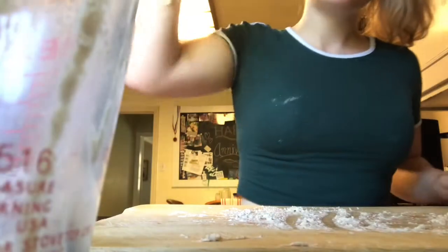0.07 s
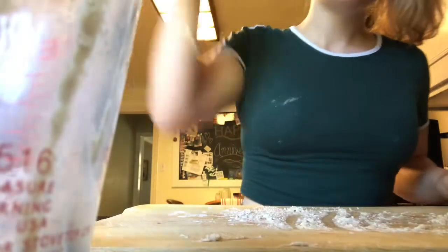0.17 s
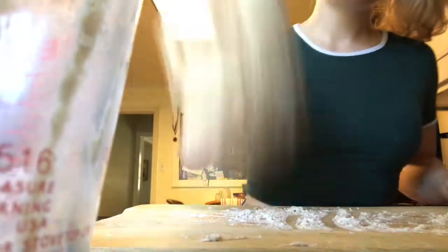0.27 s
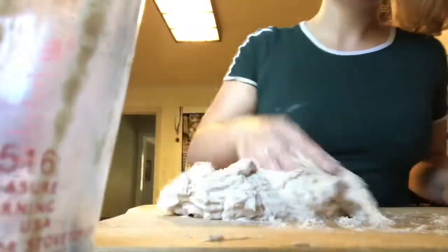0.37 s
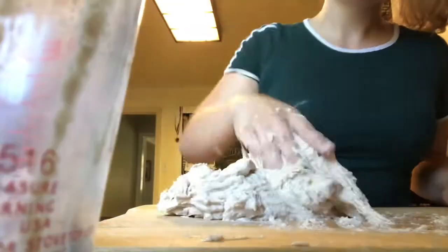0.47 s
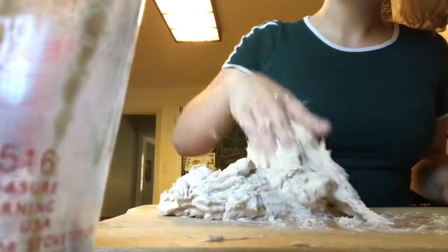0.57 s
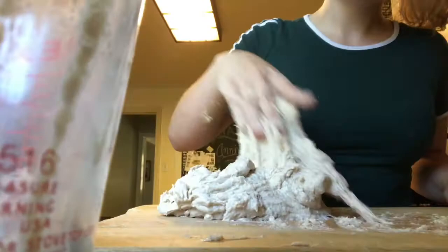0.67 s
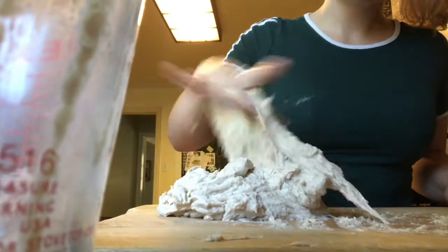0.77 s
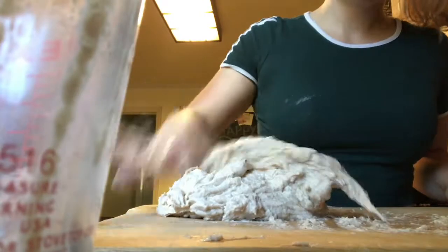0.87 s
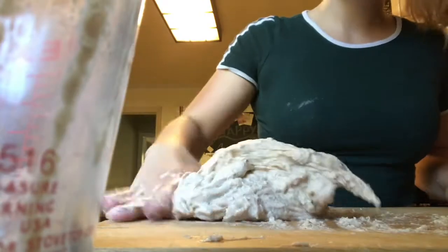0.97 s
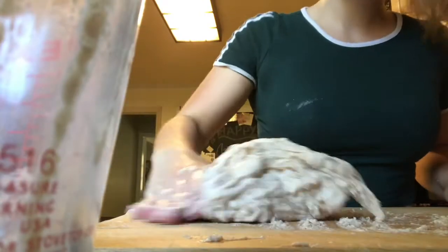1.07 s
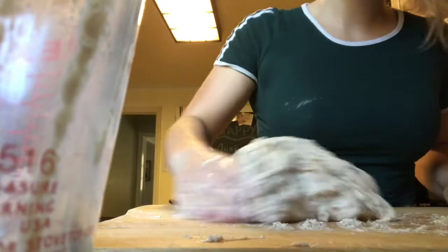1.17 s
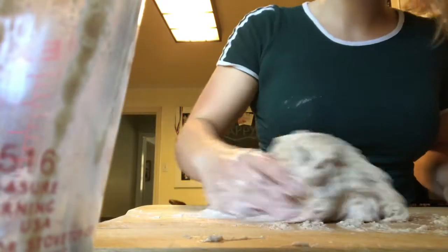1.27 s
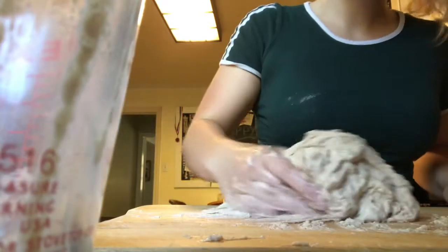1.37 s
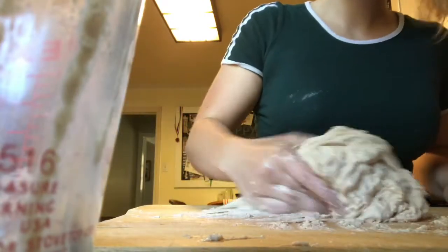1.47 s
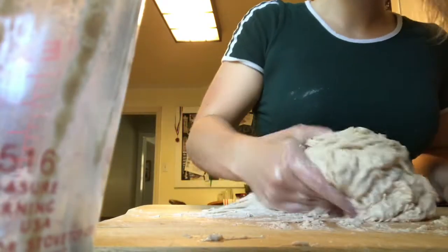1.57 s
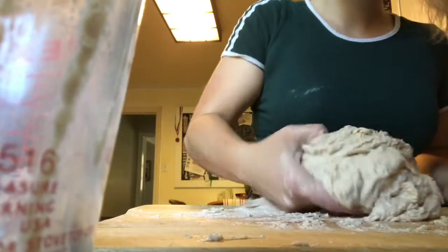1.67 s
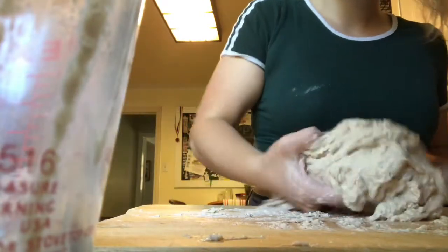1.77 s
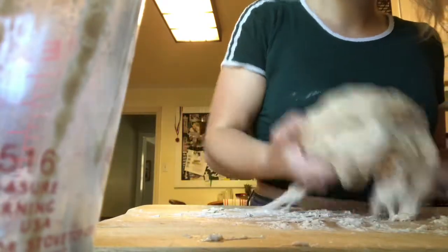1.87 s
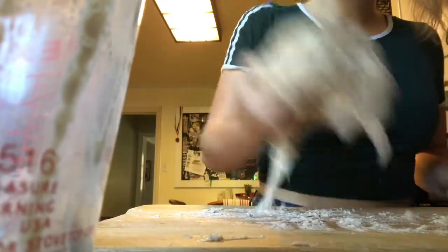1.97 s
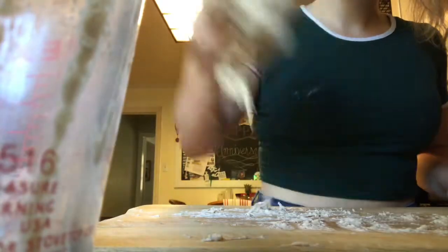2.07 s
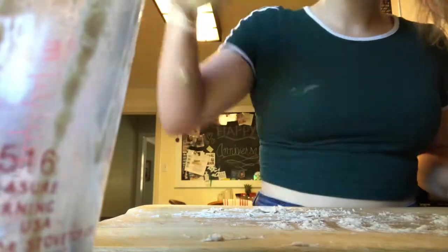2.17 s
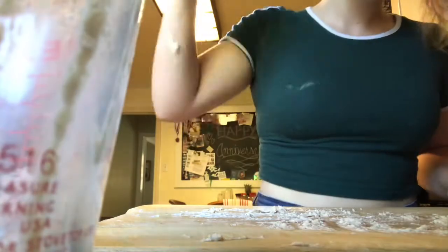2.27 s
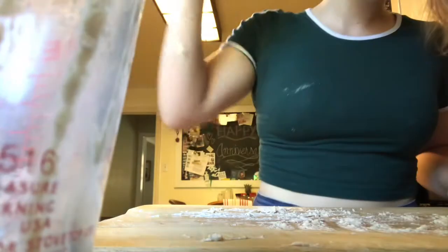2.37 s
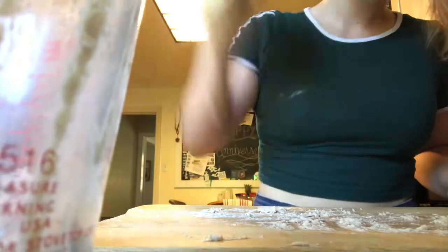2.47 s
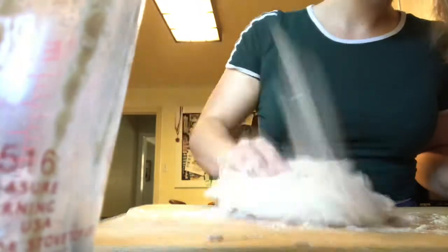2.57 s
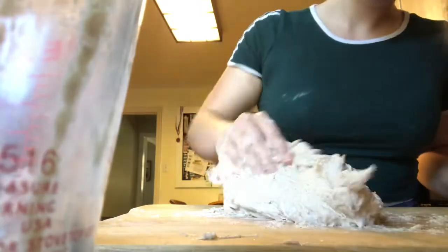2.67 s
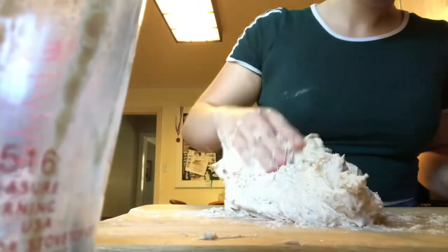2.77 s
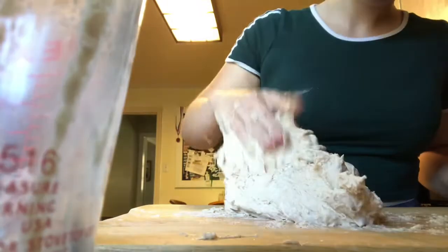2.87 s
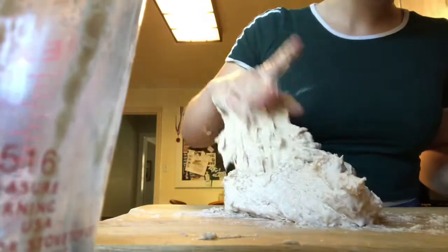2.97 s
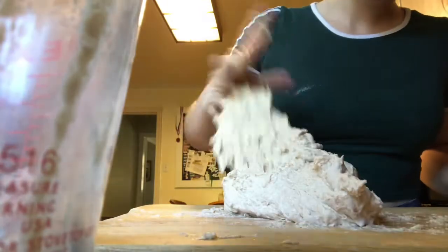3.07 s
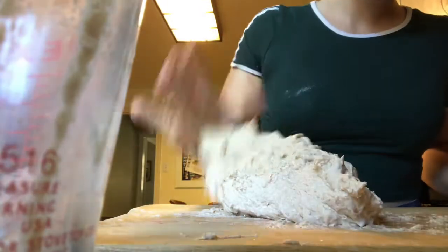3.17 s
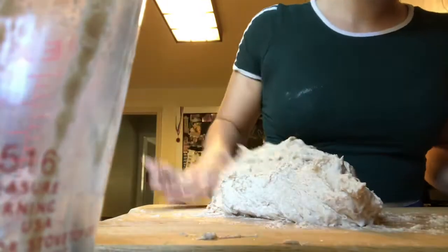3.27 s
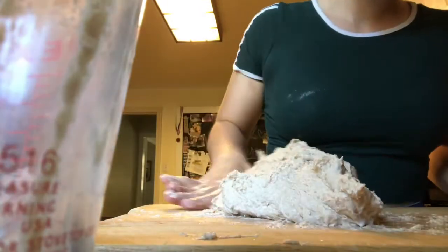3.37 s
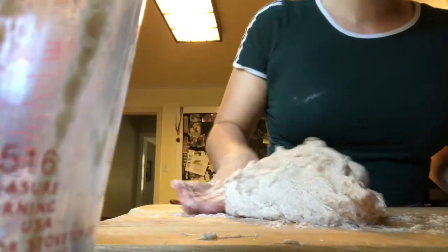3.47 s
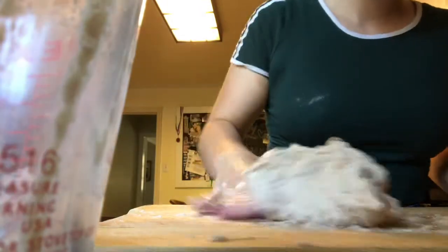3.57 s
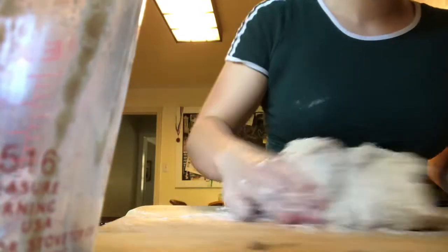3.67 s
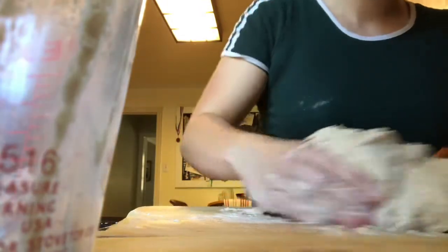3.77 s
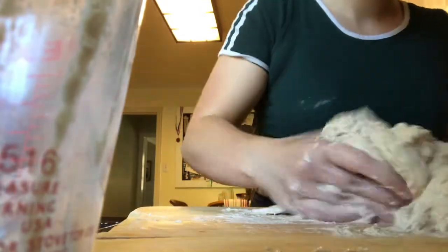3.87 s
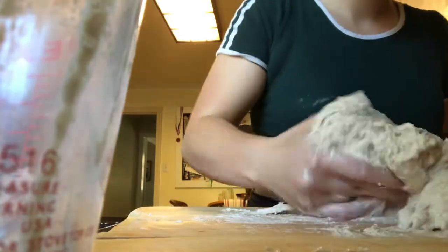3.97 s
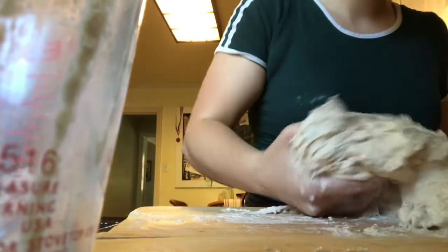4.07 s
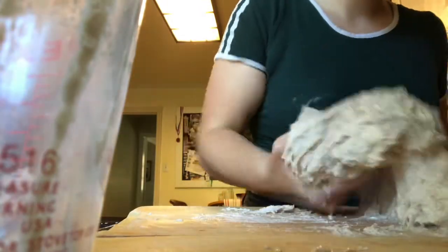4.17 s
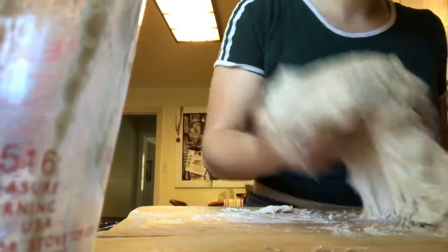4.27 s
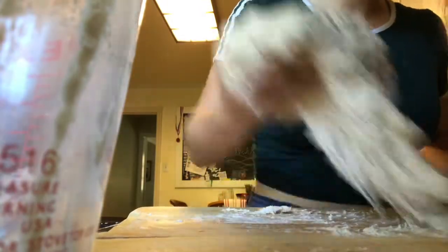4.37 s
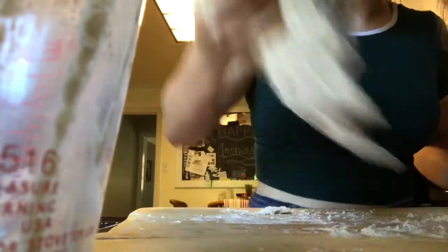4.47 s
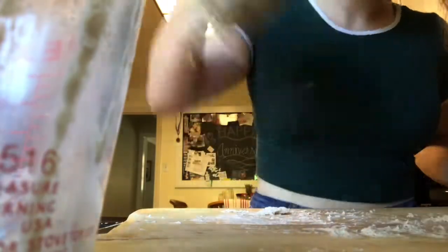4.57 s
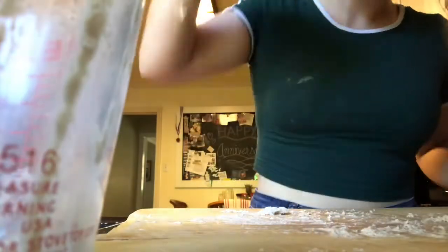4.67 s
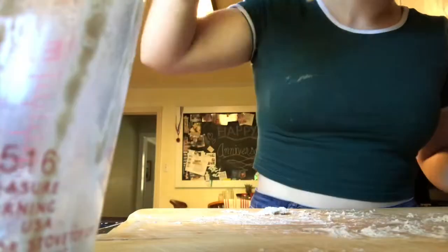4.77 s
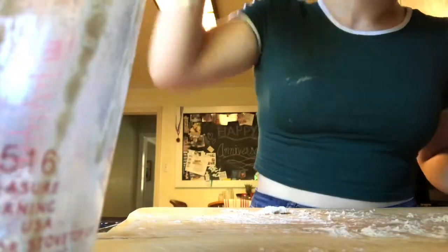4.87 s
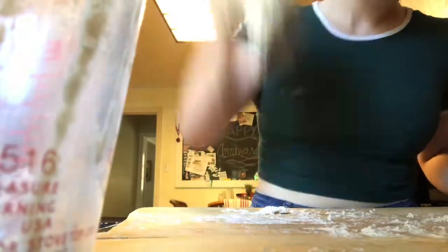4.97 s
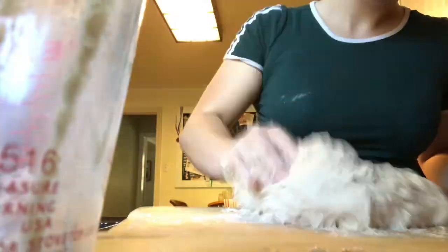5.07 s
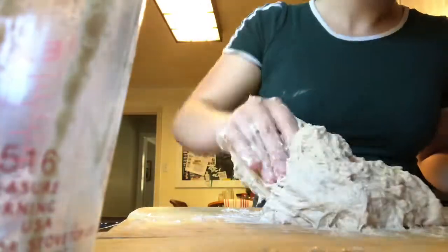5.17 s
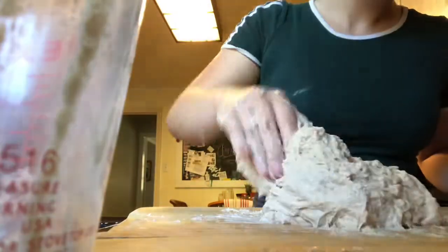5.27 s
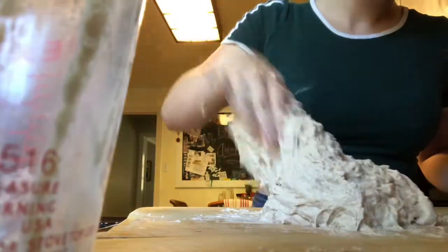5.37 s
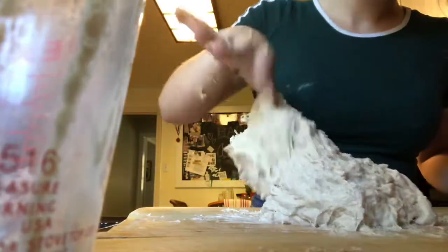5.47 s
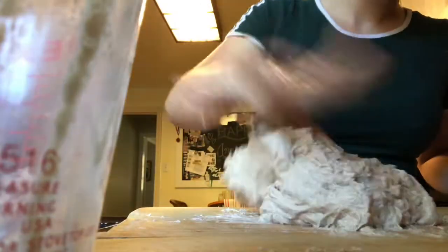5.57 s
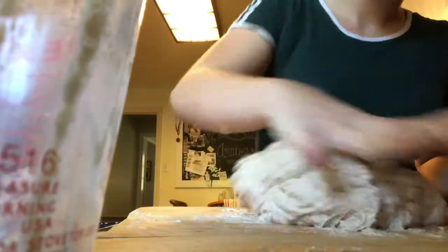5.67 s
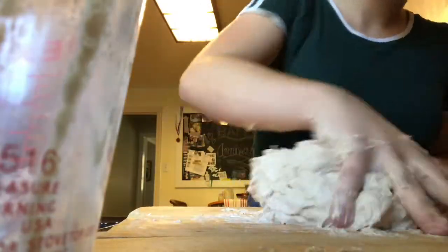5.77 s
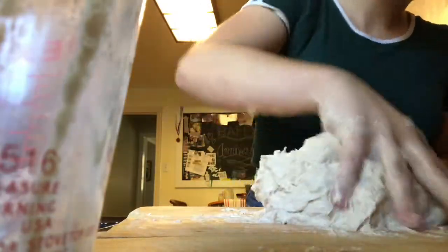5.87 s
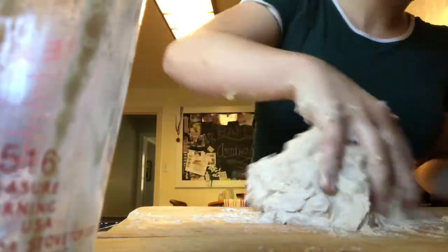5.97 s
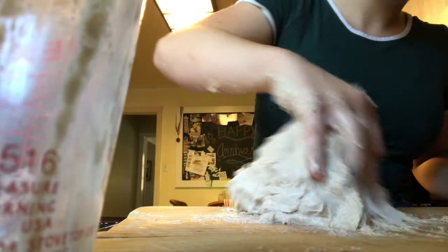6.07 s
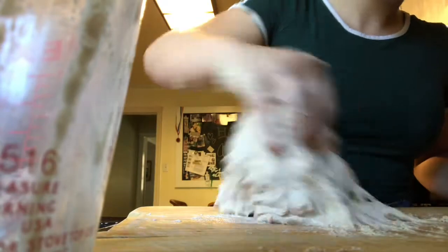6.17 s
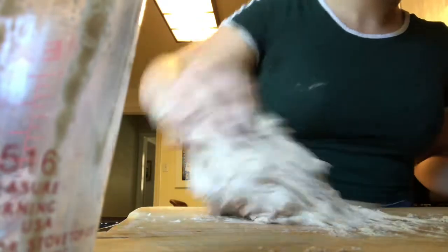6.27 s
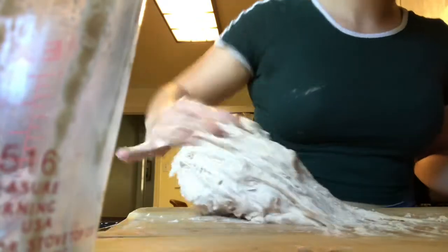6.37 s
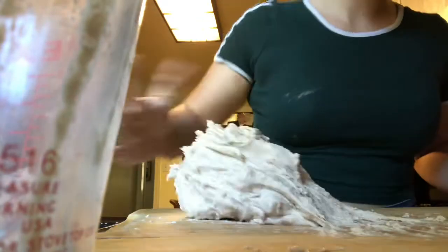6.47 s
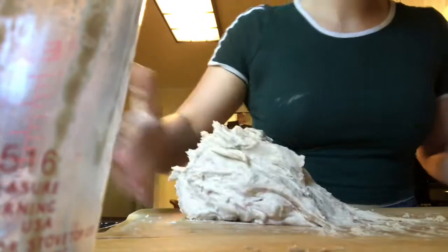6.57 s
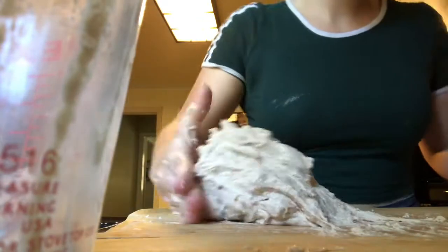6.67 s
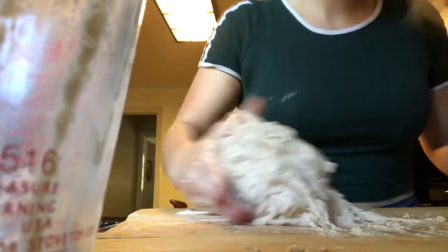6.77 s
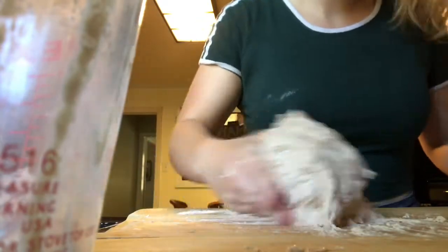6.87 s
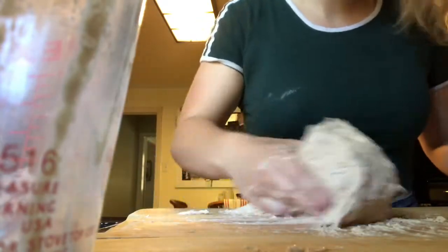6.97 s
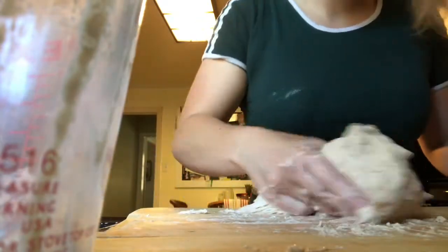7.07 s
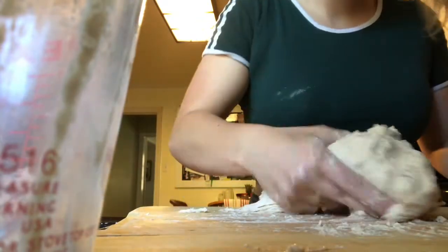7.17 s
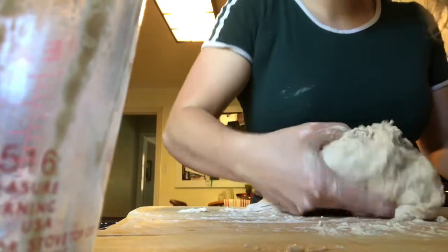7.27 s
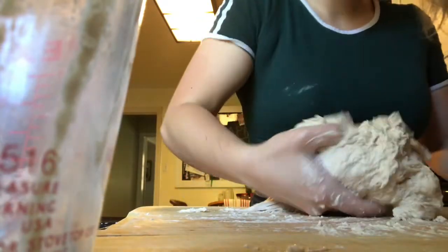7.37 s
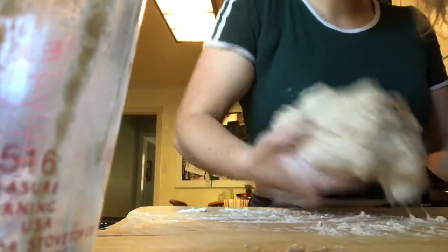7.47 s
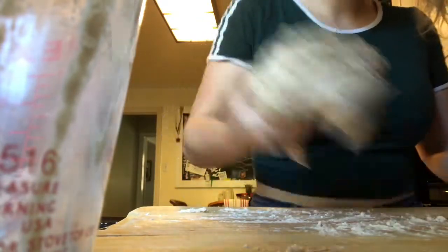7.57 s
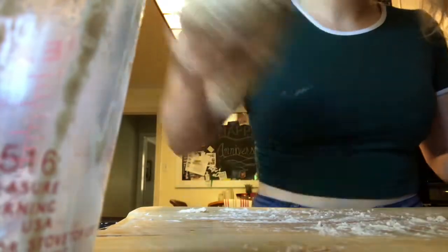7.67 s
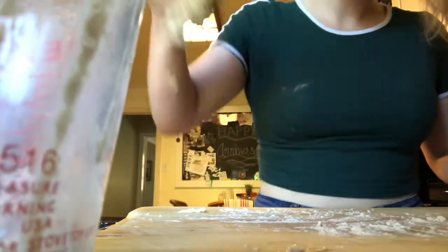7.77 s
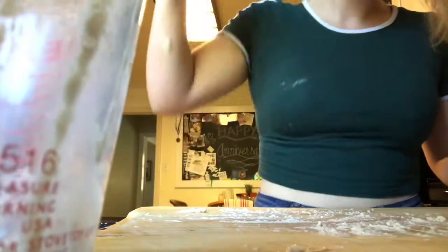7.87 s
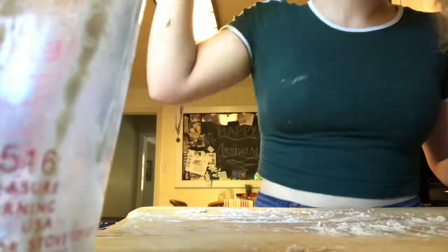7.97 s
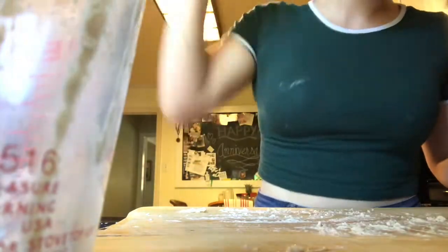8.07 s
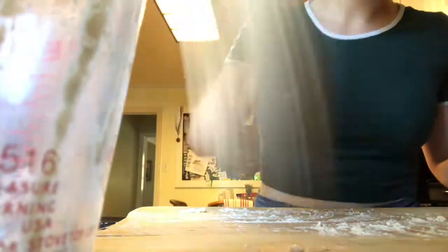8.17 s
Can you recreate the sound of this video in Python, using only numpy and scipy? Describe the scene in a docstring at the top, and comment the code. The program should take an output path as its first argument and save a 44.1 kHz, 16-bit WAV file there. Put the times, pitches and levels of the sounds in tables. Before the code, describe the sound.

Very close in a home kitchen, with faint room air and a low wavering hum. After a slight rustle, dough slams at 0.3 s: a wet smack, heavy woody thud, tail slap and short room ring. Sticky crackle and hissing rubs follow from 1 to 1.8 s, with a rising wipe near 1.1 and little strand ticks. The second slam comes at 2.5 s; dull taps from a loose object quicken and fade from 2.8. A stronger rub at 3.5-3.8 leads to soft low thuds and three accelerating hollow board knocks around 4.5-4.6. The third slam, boomier, hits at 5.0 s, followed by fainter rattling, a firm slap at 5.65, peeling crackle, a duller pat at 6.4 and another sharp slap at 7.1 with a brief falling wipe. Quiet returns until the fourth slam at 8.2 s. Automatic gain dips after loud blows and recovers.

```python
"""A kitchen, close to a floured wooden board: wet dough is slammed down four times beside a phone microphone.
Each slam is a noisy wet smack over a burst of force that excites the board's resonances and the room.
In between, hissing rubs and sleeve rustle, sticky crackle, strand ticks, pats, soft low thuds and board knocks;
a loose object rocks in dying taps. Room air and a low wavering hum lie behind.
The phone's gain control ducks the loud blows and then lets the room swell back."""
import sys
import numpy as np
from scipy import signal
from scipy.fft import rfft, irfft, next_fast_len
from scipy.io import wavfile
from scipy.ndimage import uniform_filter1d, minimum_filter1d, map_coordinates

SR = 44100
rng = np.random.default_rng(int(sys.argv[2]) if len(sys.argv) > 2 else 0)


def wav_record(signal):
    """Record a signal, one row per channel, as 16-bit PCM in the file named by sys.argv[1]."""
    frames = np.transpose(np.atleast_2d(signal))
    bounded = np.clip(frames, -1, 1)
    # unit amplitude maps onto the largest positive 16-bit level
    quanta = np.round(bounded * 32767).astype(np.int16)
    wavfile.write(sys.argv[1], SR, quanta)


N = 361708  # length of the scene in samples
CLOCK = np.arange(N) / SR  # scene time in seconds
T = np.arange(SR * 3 // 4) / SR  # time within one blow, in seconds

# Dough slammed on the board. Each row: start in seconds, level in dB, wet smack in dB against the level,
# dull above in Hz, bass in dB, hollow boom in dB, tail delay in seconds, tail slap in dB.
SLAM_EVENTS = [(0.280, 6.5, -8, 2405, 2, -1.5, 0.067, 1.5), (2.533, 4, -8.5, 2436, -1, -8.5, 0.038, 7),
               (5.016, 6.5, -11, 1514, 1, 6, .049, -10.5), (8.183, 4, -8, 2260, -5.5, 4, .05, -11)]
# Resonances of the board on its counter. Each row: centre in Hz, width in Hz, lift in dB.
BOARD_MODES = [(119, 14, 4.5), (144.4, 26, 11.5), (234, 10, -3), (373, 200, 1.5), (422, 16, 6.5),
               (512.7, 8.1, 6.5), (705, 17, 4), (957, 58, 3.5), (1050, 43, 1), (1255, 32, 4),
               (1476, 60, -3), (1687, 20, -3), (2310, 17, -0.5)]
# Colour of the dough's weight landing. Each row: frequency in Hz, gain in dB.
THUD_COLOUR = [(25, -18), (50, 0), (130, -3), (230, -4), (420, -1), (700, -2), (1400, 1), (2500, -3),
               (6000, -3.5)]
# Colour of the wet skin's smack. Each row: frequency in Hz, gain in dB.
SMACK_COLOUR = [(200, -20), (900, 4), (2000, 2.5), (5000, -3), (8000, -8.5), (12000, -17.5), (16000, -7.5)]
# Colour of the lighter slaps on the board. Each row: frequency in Hz, gain in dB.
SLAP_COLOUR = [(40, -17), (120, -4.5), (230, 2), (330, 2.5), (700, 2), (1300, 1), (2500, 0), (6000, -4.5)]
# Pats and drops on the board. Each row: start in seconds, level in dB, dull above in Hz,
# contact in seconds, bass in dB, hollow boom in dB.
PAT_EVENTS = [(3.884, -41, 1500, 0.0075, 4, 7), (4.385, -29, 1000, .011, 4, 7.5),
              (5.613, -27.5, 1150, 0.023, 7.5, 6.5), (5.654, -6, 2155, 0.0035, -2, 0),
              (6.401, -13.5, 2900, 0.0068, 8.5, 1.5), (7.0937, -6.5, 1975, 0.0024, -2.5, -3.5)]
# Dough settling its weight, and the board dropping back. Each row: start in seconds, level in dB.
LOW_THUDS = [(0.92, -50), (1.527, -45.5), (3.633, -36.5), (4.392, -37.5), (4.518, -30), (4.621, -36.5),
             (4.853, -42), (6.644, -41.5)]
# Movements of hand, arm and dough, with the sleeve's rustle as the arm swings.
# Each row: start in seconds, end in seconds, rub or rustle in dB ahead of a common trim, crackle in dB.
MOVEMENTS = [(0, 0.18, -62, -102), (0.98, 1.807, -58, -61), (2.976, 3.534, -65.5, -69),
             (3.49, 3.844, -47.5, -67), (3.854, 4.477, -58, -61), (4.81, 5.023, -61.5, -72),
             (5.736, 6.31, -72.5, -61.5), (6.278, 6.436, -53, -52), (6.455, 7.47, -57, -62)]
# Colour of the rub and rustle. Each row: frequency in Hz, gain in dB.
RUB_COLOUR = [(150, -13.5), (350, 3), (750, -2.5), (1300, -0.5), (2500, -6), (4000, -12), (6000, -12.5),
              (10000, -21.5), (16000, -18)]
# Quick wipes with pitched hiss. Each row: start in seconds, end in seconds, first pitch in Hz,
# last pitch in Hz, level in dB that the swell reaches at the end, ahead of the movement's own shape.
WIPES = [(0.99, 1.178, 1450, 2930, -41), (7.2, 7.314, 2400, 1945, -40)]
# Dough pulled off the fingers or the wood. Each row: start in seconds, crackle in dB.
STICKY_PULLS = [(0.66, -61.5), (1.66, -53), (2.899, -58), (5.288, -57)]
# Colour of sticky bonds breaking. Each row: frequency in Hz, gain in dB.
CRACKLE_COLOUR = [(2000, -12.5), (5000, -7), (9000, -9.5), (13000, -6.5), (16000, -2.5)]
# Thick strands of dough letting go. Each row: start in seconds, level in dB ahead of a common trim.
THICK_STRANDS = [(0.842, -39.5), (1.164, -30.5), (1.892, -38), (2.47, -34.5), (2.957, -34), (2.996, -30.5),
                 (4.072, -31), (4.364, -28), (6.701, -30.5)]
# Bouts of rocking. Each row: first tap in seconds, first gap in seconds, level in dB, fade in dB per second.
ROCKING_BOUTS = [(2.831, .0855, -37, 4), (5.336, .058, -45, 12)]
# Modes of the loose object. Each row: frequency in Hz, level in dB, time to fall 60 dB in seconds.
ROCKER_MODES = [(286, -10.5, 0.18), (358, -4.5, 0.098), (431, -4.5, 0.15)]
# Decay of the kitchen. Each row: frequency in Hz, time to fall 60 dB in seconds.
ROOM_DECAY = [(60, 0.49), (200, 0.24), (500, .35), (1200, 0.39), (3000, .38), (7000, 0.42), (15000, 0.23)]
# Colour of the room air. Each row: frequency in Hz, gain in dB.
AIR_COLOUR = [(25, -17.5), (62, -9), (125, -11.5), (220, -14), (350, -11), (600, -18), (1400, -27),
              (3000, -33.5), (7000, -36.5), (16000, -52.5)]
# Slow swell of the hum. Each row: time in seconds, level in dB ahead of a common lift.
HUM_SWELL = [(0, -65.5), (0.8, -62), (1.55, -54.5), (3.1, -63), (4.2, -58), (6.1, -60), (8.2, -68.5)]
# Tones of the hum. Each row: frequency in Hz, relative level in dB.
HUM_PITCHES = [(64.5, 0), (104, -8.5)]


def slams(land=0.013, sag=0.015, spread=0.045, smack_life=0.0083, smack_rise=0.0016, lumps_db=3, wet_db=-7):
    """The wet skin smacks first; then the mass flattens lump by lump and drives the board, its bass last."""
    out = np.zeros(N)
    low = lambda hz: 1 / (1 + (hz / 400) ** 4)
    for s, db, smack_db, dull_hz, bass_db, boom_db, _, _ in SLAM_EVENTS:
        smack_shape = np.exp(-T / smack_life) * (1 - np.exp(-T / smack_rise))
        smack = amp(smack_db) * noise(SMACK_COLOUR, len(T)) * smack_shape
        lumps = amp(lumps_db * wobble(250)[:len(T)])
        force = rng.standard_normal(len(T)) * lumps * np.exp(-(T / spread) ** 2)
        landing = even(force * (1 - np.exp(-(T / land) ** 2)))
        sagging = even(force * (1 - np.exp(-(T / sag) ** 2)))
        load = landing + filtered(sagging - landing, low)  # the bass follows the slower rise
        body = strike_board(load, THUD_COLOUR, softness(dull_hz, bass_db, steep=4.0), boom_db)
        body *= np.sqrt(spread * SR / 2) / np.linalg.norm(body)
        add(out, s, amp(db) * in_kitchen(smack + body, wet_db))
    return out


def flaps(graze_lead=.016, graze_db=-34.5, rebound=.11, rebound_db=-10):
    """Around each slam the loose end grazes the board, the tail slaps down and the lump flops back."""
    out = np.zeros(N)
    for s, *_, tail_s, tail_db in SLAM_EVENTS:
        add(out, s - graze_lead, amp(graze_db) * knock(contact=0.012, dull_hz=2450, bass_db=-5))
        add(out, s + tail_s, amp(tail_db) * knock(contact=.012, dull_hz=2850, bass_db=-1))
        add(out, s + rebound, amp(rebound_db) * knock(contact=0.0045, dull_hz=2040, bass_db=-25.5))
    return out


def pats():
    """Hand and dough strike the board between the slams, each contact with its own length and softness."""
    out = np.zeros(N)
    for s, db, dull_hz, contact, bass_db, boom_db in PAT_EVENTS:
        blow = knock(contact, dull_hz, bass_db, boom_db, thump_db=0, thump_life=0.0094, thump_hz=670, wet_db=-9)
        add(out, s, amp(db) * blow)
    return out


def low_thuds():
    """Soft low thuds: dough settling its weight, and the board dropping back; a soft contact has no treble."""
    out = np.zeros(N)
    for s, db in LOW_THUDS:
        add(out, s, amp(db) * knock(contact=0.025, dull_hz=270, bass_db=9, thump_life=.015))
    return out


def clatter(first_s=4.504, first_gap=.048, shrink=.76, level_db=-24, swell_db=2, count=3):
    """Lifted by the sticky dough, the board drops back and knocks ever faster and harder, ringing hollow."""
    out = np.zeros(N)
    for k in range(count):
        s = first_s + first_gap * (1 - shrink ** k) / (1 - shrink)  # each gap is shrink times the last
        blow = knock(contact=0.0036, dull_hz=1750, bass_db=3, boom_db=7,
                     thump_db=-4.5, thump_life=.014, thump_hz=475, wet_db=-10)
        add(out, s, amp(level_db + swell_db * k) * blow)
    return out


def rubbing(rub_db=-1, uneven_db=2, bounce=0.12, comb_hz=2680, stick_db=-6, stick_rate=60):
    """Sliding dough and the rustling sleeve hiss as noise, with the small jerks of catch and slip."""
    jerks = amp(2.5 * wobble(300))
    # the hiss also bounces off the board just below, which combs its spectrum
    comb = lambda hz: 1 + bounce * np.exp(-2j * np.pi * hz / comb_hz)
    hiss = noise(RUB_COLOUR, N, comb) * jerks
    slips = (rng.random(N) < stick_rate / SR) * rng.standard_normal(N)  # stick_rate slips a second
    slips = unit(filtered(slips, lambda hz: causal(amp(along(RUB_COLOUR, hz)))))
    rub = hiss + amp(stick_db) * slips
    # lows and highs waver separately
    lows = filtered(rub, lambda hz: 1 / (1 + (hz / 2200) ** 4))
    rub = lows * amp(uneven_db * wobble(13)) + (rub - lows) * amp(uneven_db * wobble(28))
    pressure = sum(amp(db) * movement(start, end) for start, end, db, _ in MOVEMENTS)
    return in_kitchen(amp(rub_db) * rub * pressure, wet_db=-10.5)


def scrapes(width_hz=550, swell_db=17):
    """A wipe swells while its band of hiss glides: low noise is shifted up by a gliding tone."""
    out = np.zeros(N)
    for start, end, first_hz, last_hz, db in WIPES:
        band = unit(filtered(rng.standard_normal(N), lambda hz: 1 / (1 + (hz / width_hz) ** 2)))
        pitch = np.interp(CLOCK, [start, end], [first_hz, last_hz])
        phase = 2 * np.pi * np.cumsum(pitch) / SR
        swell = amp(np.interp(CLOCK, [start, end], [db - swell_db, db]))
        out += band * np.sin(phase) * movement(start, end) * swell
    return out


def peeling(grain_rate=700, clump_db=3, pull=0.18):
    """Tiny sticky bonds break in clumps as the dough is moved or pulled."""
    # grain_rate bonds a second; each pull lasts pull seconds
    bonds = (rng.random(N) < grain_rate / SR) * rng.standard_normal(N) * amp(clump_db * wobble(30))
    crackle = filtered(bonds, lambda hz: amp(along(CRACKLE_COLOUR, hz)))
    crackle = unit(in_kitchen(crackle, wet_db=-1.5))
    moved = sum(amp(db) * movement(start, end) for start, end, _, db in MOVEMENTS)
    pulled = sum(amp(db) * movement(start, start + pull) for start, db in STICKY_PULLS)
    return crackle * (moved + pulled)


def snaps(trim_db=-9, thin_db=-45, scatter_db=4, count=20):
    """A stretched strand parts with a small bright tick; thin ones go at random."""
    out = np.zeros(N)
    tear = np.exp(-T / .0018)
    tick_colour = [(1000, -21.5), (3500, -4.5), (8000, -3), (16000, 0)]  # Hz, dB
    thin = [(when * N / SR, thin_db + scatter_db * (2 * size - 1)) for when, size in rng.random((count, 2))]
    for s, db in THICK_STRANDS + thin:
        add(out, s, amp(db + trim_db) * noise(tick_colour, len(T)) * tear)
    return in_kitchen(out, wet_db=-1.5)


def rocking(count=23, quicken=.00138, rise=.004):
    """A loose object rocks from edge to edge, its dull taps quickening and fading as it settles."""
    out, k = np.zeros(N), np.arange(count)
    for first, gap, db, fade_db in ROCKING_BOUTS:
        for s in first + gap * k - quicken * k ** 2 / 2:  # gaps shorten by quicken seconds a tap
            tap = ring(ROCKER_MODES) * (1 - np.exp(-T / rise))
            add(out, s, amp(db - fade_db * (s - first)) * tap)
    return out


def background(air_db=-62, lift_db=1):
    """Room air as coloured noise, and a low hum whose tones waver in level and phase."""
    hum = 0
    for hz, db in HUM_PITCHES:
        hum = hum + amp(db + 0.73 * wobble(26)) * np.sin(2 * np.pi * hz * CLOCK + 0.86 * wobble(6.8))
    swell = amp(lift_db + np.interp(CLOCK, *np.transpose(HUM_SWELL)))
    return amp(air_db) * noise(AIR_COLOUR, N) + swell * unit(hum)


def knock(contact, dull_hz, bass_db, boom_db=0, thump_db=-1, thump_life=0.018, thump_hz=480, wet_db=-7):
    """A blow on the board: a burst of contacts plus a low thump as the weight settles."""
    thump = filtered(patter(thump_life), lambda hz: causal(1 / (1 + (hz / thump_hz) ** 4)))
    load = patter(contact) + amp(thump_db) * thump
    blow = strike_board(load, SLAP_COLOUR, softness(dull_hz, bass_db, steep=7.1), boom_db)
    blow *= np.sqrt(contact * SR / 2) / np.linalg.norm(blow)  # energy grows with the length of contact
    return in_kitchen(blow, wet_db, dull_hz=2200, walls_db=3)


def strike_board(load, colour, weight, boom_db):
    """The load, coloured by its contact and by where it lands, drives the board's resonances."""
    gain = lambda hz: amp(along(colour, hz)) * weight(hz) * boom(hz, boom_db)
    return filtered(load, lambda hz: causal(gain(hz)) * board(hz))


def board(hz):
    """Response of the board: a direct path plus its resonances."""
    return 1 + sum(amp(db) * 1j * hz * width / (centre ** 2 - hz ** 2 + 1j * hz * width)
                   for centre, width, db in BOARD_MODES)


def boom(hz, db, centre_hz=430, width_hz=170):
    """Where a blow lands decides how strongly the board's middle modes speak."""
    return amp(db * np.exp(-((hz - centre_hz) / width_hz) ** 2))


def softness(dull_hz, bass_db, steep, bass_hz=230):
    """A soft contact loses treble; more mass behind it gives more bass."""
    return lambda hz: amp(bass_db / (1 + (hz / bass_hz) ** 4)) / np.sqrt(1 + (hz / dull_hz) ** steep)


def patter(life):
    """A dying burst of tiny contacts that covers all bands evenly."""
    burst = even(rng.standard_normal(len(T)) * np.exp(-T / life), size=90)
    return burst / np.linalg.norm(burst)


def movement(start, end, edge=0.058, arch_db=3.5):
    """Gain of one movement: soft edges, strongest midway."""
    progress = np.clip((CLOCK - start) / (end - start), 0, 1)
    edges = np.clip(np.minimum(CLOCK - start, end - CLOCK) / edge, 0, 1)
    return edges * amp(-arch_db * (2 * progress - 1) ** 2)


def ring(modes):
    """Damped modes, struck a little differently each time."""
    return sum(amp(db + rng.normal()) * fade(t60) * np.sin(2 * np.pi * (hz * T + rng.random()))
               for hz, db, t60 in modes)


def in_kitchen(sound, wet_db, dull_hz=14000, build=0.00057, walls_db=5.5):
    """The sound plus a tail of uneven wall echoes in which each frequency dies at its own speed."""
    hz, t, z = signal.stft(rng.standard_normal(len(T)), SR, nperseg=256)
    decay = np.exp(-np.log(1000) * t / along(ROOM_DECAY, hz)[:, None])
    tail = signal.istft(z * decay, SR, nperseg=256)[1][:len(T)]
    bunching = np.interp(T, np.linspace(0, T[-1], num=110), rng.standard_normal(size=110))
    tail = tail * (1 - np.exp(-T / build)) * amp(walls_db * bunching)
    tail = filtered(tail / np.linalg.norm(tail), lambda hz: 1 / np.hypot(1, hz / dull_hz))
    return sound + amp(wet_db) * signal.fftconvolve(sound, tail)[:len(sound)]


def amp(db):
    """Decibels to gain."""
    return 10 ** (np.asarray(db) / 20)


def unit(x):
    """Scale to rms 1."""
    return x / np.sqrt(np.mean(x ** 2) + 1e-20)


def along(points, hz):
    """Rows of frequency in Hz and value, read on a log frequency axis."""
    f, v = np.transpose(points)
    return np.interp(np.log(hz + 1), np.log(f + 1), v)


def filtered(x, response):
    """x times a response of frequency."""
    size = next_fast_len(len(x) + 8192)
    return irfft(rfft(x, size) * response(np.fft.rfftfreq(size, 1 / SR)), size)[:len(x)]


def causal(gain):
    """The minimum-phase response with this gain, so that nothing sounds before a blow."""
    cepstrum = irfft(np.log(np.maximum(gain, 1e-6)))
    half = len(cepstrum) // 2
    cepstrum[1:half] *= 2
    cepstrum[half + 1:] = 0
    return np.exp(rfft(cepstrum))


def even(burst, size=40):
    """Level out the chance peaks and dips in a burst's spectrum, averaged over size bins."""
    z = rfft(burst)
    power = np.abs(uniform_filter1d(np.abs(z) ** 2, size=size))
    return irfft(z * causal(np.sqrt(power.mean() / power)), len(burst))


def noise(spectrum, size, weight=lambda hz: 1):
    """Coloured noise of rms 1."""
    return unit(filtered(rng.standard_normal(size), lambda hz: amp(along(spectrum, hz)) * weight(hz)))


def wobble(rate):
    """A smooth random curve, rate knots a second."""
    return map_coordinates(rng.standard_normal(2048), [CLOCK * rate], mode="wrap")


def fade(t60):
    """A decay of 60 dB in t60 seconds."""
    return np.exp(-np.log(1000) * T / t60)


def add(track, s, sound):
    """Mix a sound in at time s."""
    part = track[round(s * SR):][:len(sound)]
    part += sound[:len(part)]


def scene():
    """Everything reaches one microphone beside the board."""
    blows = slams() + flaps() + pats() + low_thuds() + clatter()
    handling = rubbing() + scrapes() + peeling() + snaps()
    return (blows + handling + rocking() + background())[None]


def record(dry, limit_db=-7, hold=0.14, release=0.14, knee=5, top_hz=15800):
    """Gain control ducks loud blows, holds, then recovers; peaks clip softly; the top band is cut."""
    x = dry[0]
    power = np.abs(uniform_filter1d(x ** 2, size=180))
    needed_db = np.minimum(0, limit_db - 10 * np.log10(power + 1e-12))
    held, eased = int(hold * SR), int(release * SR)
    # the shifted origins make both windows look back in time
    held_db = minimum_filter1d(needed_db, held, origin=(held - 1) // 2, mode="nearest")
    eased_db = uniform_filter1d(held_db, eased, origin=(eased - 1) // 2, mode="nearest")
    x = x * amp(np.minimum(held_db, eased_db))
    x = x / (1 + np.abs(x) ** knee) ** (1 / knee)
    return filtered(x, lambda hz: 1 / (1 + (hz / top_hz) ** 160))[None]


dry = scene()
out = record(dry)
wav_record(out)
```